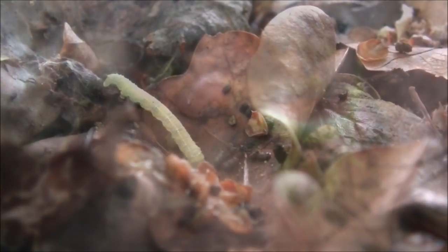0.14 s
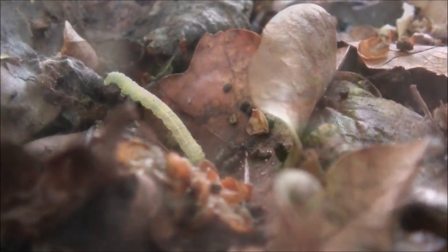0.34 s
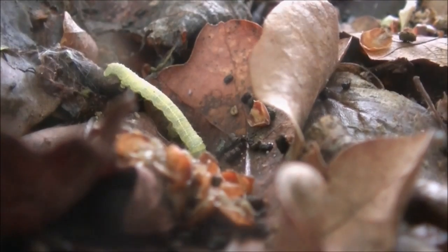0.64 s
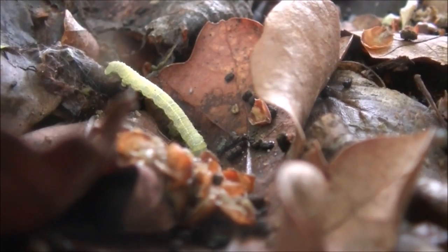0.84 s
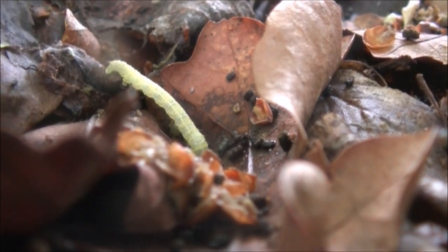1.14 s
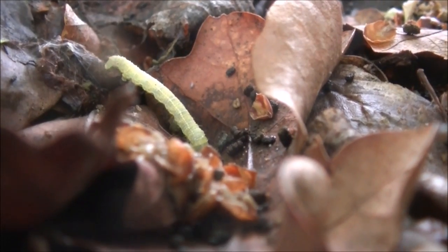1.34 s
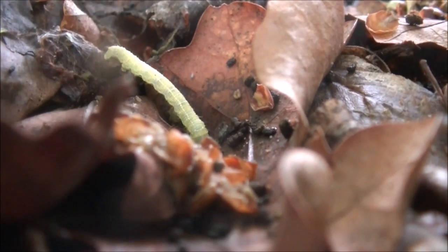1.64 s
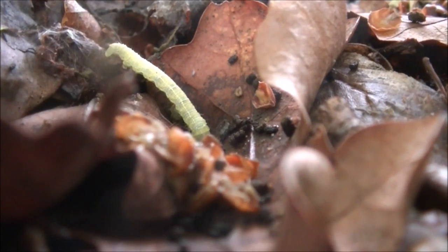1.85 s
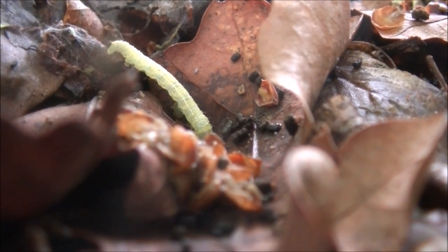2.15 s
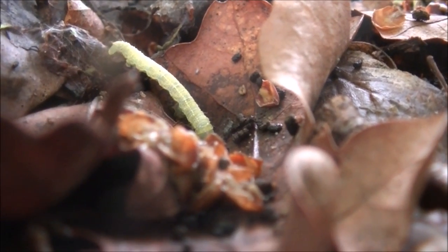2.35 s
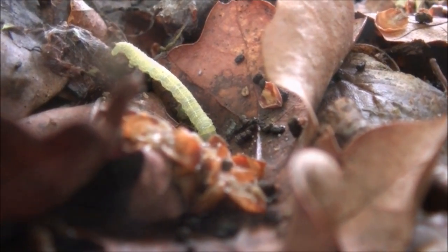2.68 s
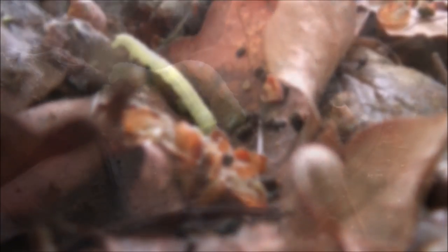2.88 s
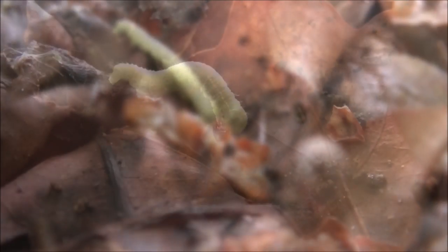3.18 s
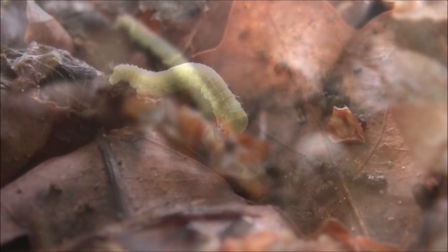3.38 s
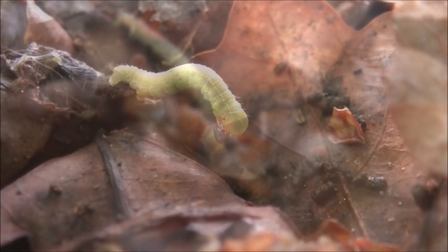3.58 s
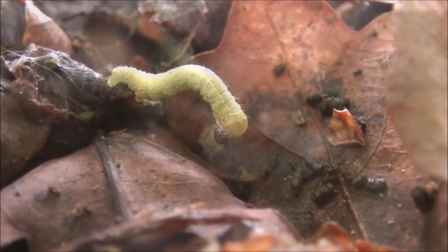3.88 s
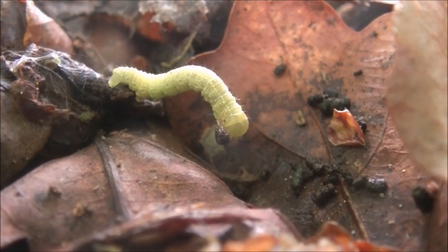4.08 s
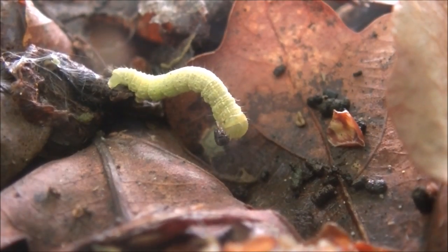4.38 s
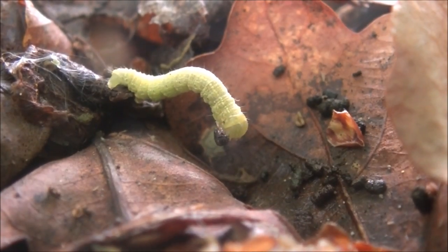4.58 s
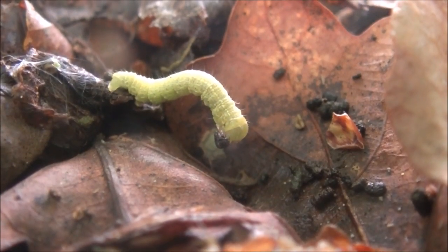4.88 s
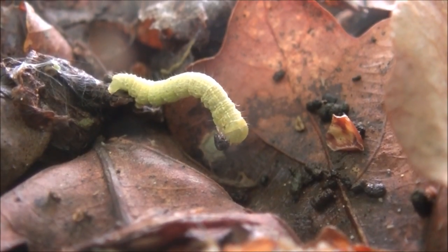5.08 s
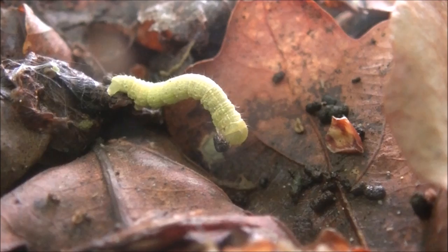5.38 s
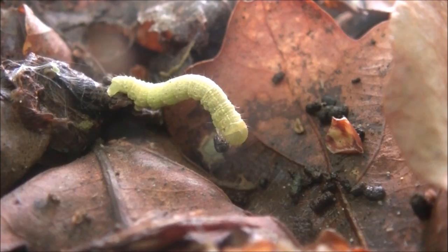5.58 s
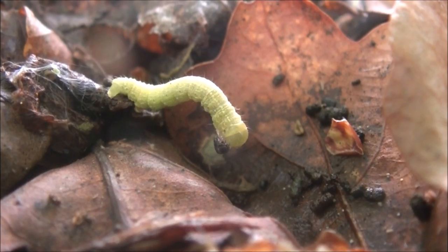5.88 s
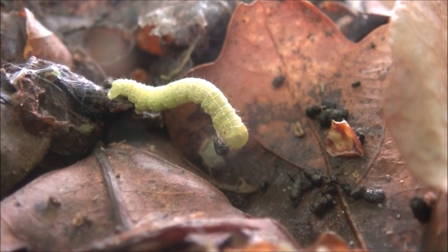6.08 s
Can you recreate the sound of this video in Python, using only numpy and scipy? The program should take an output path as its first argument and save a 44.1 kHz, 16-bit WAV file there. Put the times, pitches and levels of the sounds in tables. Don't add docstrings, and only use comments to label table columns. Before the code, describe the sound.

Pellets patter sparsely onto stiff dead leaves right beside a stereo microphone, like scattered raindrops. Light ticks come first, a hard crack near two seconds, then a cluster of strong snapping blows between about 2.8 and 4.2 seconds, followed by sparse, quieter ticks. Small leaf scrapes and dull thuds lie beneath. High bird chips and short whistles echo far off among trees, over a soft hush and barely audible high whine.

```python
import sys
import numpy as np
from scipy import signal
from scipy.fft import rfft, irfft
from scipy.io import wavfile
from scipy.ndimage import uniform_filter1d

SR = 44100
rng = np.random.default_rng(int(sys.argv[2]) if len(sys.argv) > 2 else 0)


def makeup_ratio(level_db):
    decades = np.asarray(level_db, float) / 20
    return 10 ** decades


def unload_audio(sound):
    columns = np.transpose(np.atleast_2d(sound))
    steps = np.round(np.clip(columns, -1, 1) * 32767)
    wavfile.write(sys.argv[1], SR, steps.astype(np.int16))


N = 274729


def evened(x):
    return x / np.sqrt(np.mean(x ** 2) + 1e-20)


def read(points, hz):
    f, value = np.transpose(points)
    return np.interp(np.log(hz + 1), np.log(f + 1), value)


def follow(rows):
    s, db = np.transpose(rows)
    return makeup_ratio(np.interp(np.arange(N) / SR, s, db, left=-140, right=-140))


def add(mix, s, sound):
    part = mix[..., round(s * SR):][..., :sound.shape[-1]]
    part += sound[..., :part.shape[-1]]


def sides(pan_db):
    return makeup_ratio(np.array([[pan_db / 2], [-pan_db / 2]]))


def bandpass(order, low_hz, high_hz, x):
    return signal.sosfilt(signal.butter(order, [low_hz, high_hz], "bandpass", fs=SR, output="sos"), x)


def low_cut(x):
    return signal.sosfilt(signal.butter(2, 330, "highpass", fs=SR, output="sos"), x)


def coloured(x, colour, same):
    hz = np.fft.rfftfreq(N, 1 / SR)
    mid, side = rfft(x) * makeup_ratio(read(colour, hz))
    likeness = np.clip(read(same, hz), -1, 1)
    mid = mid * np.sqrt(1 + likeness)
    side = side * np.sqrt(1 - likeness)
    return evened(irfft(np.array([mid + side, mid - side]), N))


def modes(t, hz, t60, rise):
    decay = makeup_ratio(-60 * t / np.reshape(t60, (-1, 1)))
    ring = (np.sin(2 * np.pi * np.outer(hz, t)) * decay).sum(0)
    ring = ring * (1 - np.exp(-t / rise))
    return ring / np.linalg.norm(ring)


def burst(noise, t, low_hz, high_hz, t60):
    snap = bandpass(3, low_hz, high_hz, noise * makeup_ratio(-60 * t / t60))
    return snap / np.linalg.norm(snap) * np.sqrt(len(noise))


def pellets():
    # (t/s, leaf ring level/dB, leaf ring f/Hz, low knock/dB, bright crack/dB)
    hard_left = [
        (0.3284, -32, 4640, -50, -28),
        (1.4801, -20.5, 5830, -41.5, -56),
        (2.5046, -22.5, 4020, -44, -30),
        (2.8629, -28, 4200, -36, -22),
        (3.7111, -20, 4800, -34, -50),
        (3.7238, -26, 5200, -42, -49),
        (4.0188, -32, 4450, -45, -35),
    ]
    hard_ahead = [
        (2.8011, -18, 5200, -32, -16),
        (2.8907, -16, 5210, -32, -18),
        (3.5328, -16, 5000, -32, -22.5),
        (3.5756, -17.5, 5260, -30, -41),
        (3.9594, -27, 6370, -64, -27.5),
        (4.1815, -26.5, 6600, -46, -34.5),
        (5.7612, -29, 5220, -44, -26),
        (5.8206, -32, 5190, -42, -28),
    ]
    hard_right = [
        (0.7531, -37, 5010, -50, -35.5),
        (1.8424, -26.5, 6460, -63, -28.5),
        (1.8572, -30, 2680, -47, -38),
        (1.9703, -20, 3300, -45, -18),
        (2.0299, -28, 4900, -46, -26),
        (2.5261, -31, 6500, -48.5, -28),
        (3.1049, -30, 4800, -38, -22),
        (4.8638, -28.5, 3540, -50, -43.5),
    ]
    # (t/s, strength/dB, leaf ring f/Hz, left minus right/dB)
    on_thick = [(0.6211, -26, 3600, 0.5), (1.1362, -27, 2590, 6.5), (1.2383, -27, 2620, 7.5),
                (1.2707, -27, 2670, 6), (1.4196, -28, 4000, 6), (1.4284, -34.5, 2500, 10),
                (1.6258, -41.5, 2400, 8), (2.4853, -42, 3490, -3), (2.8483, -29.5, 5700, 3),
                (2.885, -33, 5200, 8), (3.0407, -26, 4530, 4), (3.1227, -38, 2200, -1),
                (3.3482, -30, 2270, 0), (3.991, -30.5, 4700, 1), (4.0239, -32, 3360, 5),
                (4.4625, -41, 3940, -1), (4.5777, -40.5, 4650, 5), (4.765, -36.5, 5600, 3),
                (5.404, -36, 3800, 0), (5.412, -42, 3750, -7), (5.863, -45, 2020, 2),
                (6.1077, -43.5, 3620, -3)]
    on_thin = [(0.2862, -36.5, 6000, 2), (0.3215, -36, 4010, 7), (0.3352, -43, 3840, -5),
               (0.5362, -31, 3500, 1), (1.1789, -32.5, 3800, -2), (1.5376, -39, 4340, 2),
               (1.7049, -36.5, 4100, 2), (2.0606, -30.5, 4740, 4), (2.3223, -38, 5340, 1),
               (3.0965, -34, 3730, 2), (3.2888, -34.5, 4700, 0), (5.5956, -34.5, 5130, 1),
               (5.7932, -40, 3320, 5)]
    on_crisp = [(0.1292, -42.5, 2500, -6), (0.4144, -31, 3940, 0), (0.6, -43, 4400, 1),
                (1.2161, -36, 6160, -4), (1.734, -32.5, 6300, -1), (1.8776, -33, 6370, -3),
                (1.9229, -30, 4360, -2), (2.9297, -27.5, 4300, -3), (3.9005, -37.5, 6700, 1),
                (3.937, -37, 6660, 0), (3.946, -47, 6900, -2), (3.9713, -38, 4500, -12),
                (4.623, -43, 6800, 0), (4.818, -50, 4320, -1), (5.3312, -39.5, 4120, 0),
                (6.1198, -38, 6000, -2)]
    on_loose = [(0.4811, -39.5, 3340, 5), (0.6995, -36, 5300, 7), (0.8579, -39.5, 4360, -1),
                (1.1637, -39.5, 4360, 4), (1.5036, -40.5, 4360, 5), (1.6046, -32.5, 3300, -1),
                (1.6364, -38, 4770, -2), (1.69, -36.5, 1790, -3), (1.814, -38, 4540, 0),
                (2.1646, -38, 3600, 0), (2.5895, -34.5, 3870, 0), (2.6485, -38, 4400, 3),
                (2.7311, -40.5, 3350, -4), (3.1744, -31.5, 5600, -4.5), (3.6019, -36.5, 5500, -5),
                (3.706, -43, 5500, -4), (3.7692, -35, 2740, -2), (3.8357, -35, 4500, -8),
                (3.889, -34.5, 1840, -4), (4.2835, -39.5, 1720, -4), (4.887, -46, 4200, 10),
                (4.943, -45, 4030, -6), (3.1015, -29, 5040, 2), (3.108, -35, 4570, 1),
                (0.1, -45.5, 6140, 2)]
    on_far = [(.085, -45, 6500, 0), (1.975, -42, 6800, -2), (1.981, -38, 4600, -2), (2.025, -40, 6500, -2),
              (2.917, -46, 6800, 0), (3.738, -44, 6500, 0), (.541, -36, 6700, 0), (.953, -48, 5500, 0),
              (1.12, -47, 2000, 1), (1.221, -38, 2500, 0), (1.253, -43, 6600, 0), (1.396, -43, 6200, 0),
              (1.597, -44, 1700, 0), (2.185, -46, 1700, 0), (2.614, -44, 2000, 0), (2.771, -42, 4000, 1),
              (3.205, -46, 6000, 0), (3.292, -40, 2200, 0), (3.377, -44, 6500, 0), (3.752, -43, 2800, 0),
              (3.778, -43, 6000, 0), (3.855, -42, 6700, 1), (3.92, -42, 1700, 0), (4.045, -42, 2000, 0),
              (4.171, -37, 5800, 0), (4.211, -41, 3640, 0), (4.255, -45, 3640, 0), (5.383, -46, 3500, -1),
              (5.505, -49, 2700, 0), (5.665, -48, 6000, 0), (5.75, -44, 6700, 0), (5.965, -46, 3500, 0)]
    # (ring/dB, knock/dB, crack/dB)
    thick = (0, -20.5, -39)
    thin = (0, -33, -14)
    crisp = (-1, -27, 0)
    loose = (0, -12, -3)
    far = (0, -14, -6)

    landings = []
    for rows, pan_db in [(hard_left, 3), (hard_ahead, .8), (hard_right, -4)]:
        landings += [tuple(row) + (pan_db,) for row in rows]
    kinds = [(on_thick, thick), (on_thin, thin), (on_crisp, crisp), (on_loose, loose), (on_far, far)]
    for rows, (ring_db, knock_db, crack_db) in kinds:
        for s, db, hz, pan_db in rows:
            landings.append((s, db + ring_db, hz, db + knock_db, db + crack_db, pan_db))
    return landings


def ticks():
    out, t = np.zeros((2, N)), np.arange(1800) / SR
    rows = pellets()
    grit = rng.standard_normal((len(rows), 3, len(t)))
    chance = rng.random((len(rows), 3))
    for (s, ring_db, hz, knock_db, crack_db, pan_db), u, (a, b, c) in zip(rows, chance, grit):
        slap = burst(a + .25 * np.array([b, -b]), t, min(.85 * hz, 3600), 7000, .0022)
        crack = burst(c + .26 * np.array([a, -a]), t, 7980, 10560, .0041)
        spark = burst(b + .15 * np.array([c, -c]), t, 12300, 16200, .002)
        crunch = burst(b + .27 * np.array([c, -c]), t, 323, 1790, .0073)

        leaf = modes(t, [hz], .005, .00006) + makeup_ratio(-4) * slap
        leaf = leaf + makeup_ratio(-14.5) * modes(t, [2200], .0036, .00053)
        leaf = leaf + makeup_ratio(-9) * modes(t, [2200, 1400 + 3000 * u[2], 3900], .0082, .0018)

        knock = modes(t, [560 + 200 * u[0], 850 + 500 * u[1]], [.012, .01], .000095) + makeup_ratio(6) * crunch
        knock = knock + .36 * np.roll(knock, 9) * [[-1], [1]]

        tick = makeup_ratio(ring_db) * leaf + makeup_ratio(crack_db) * (crack + makeup_ratio(-15.5) * spark) + makeup_ratio(knock_db) * knock
        add(out, s - .0001, makeup_ratio(11.5) * tick * sides(pan_db))
    return low_cut(out)


def stiff_leaves():
    # (f/Hz, spectral height/dB, t60/s)
    struck = [((0.3282, .0003, 2), [(2000, 0, .006), (3850, -1, .004), (5500, 0, .004)]),
              ((0.7531, .0003, -3), [(900, -2, .012), (2300, 0, .008)]), ((1.4196, .0002, 5),
              [(2540, 8, .006), (5800, 3, .003)]), ((1.9703, .0002, -2), [(2230, 15, .004),
              (3200, 13, .003), (5510, 9, .004), (9190, 12, .003)]), ((2.0295, .0009, -2), [(624, 0, .02),
              (2130, 7, .012), (2730, 6, .01), (4150, 3, .006)]), ((2.8011, .0001, 1), [(840, 14, .005),
              (2170, 15, .009), (2850, 0, .01), (4005, 20, .006), (5200, 14, .003), (7480, 11, .003),
              (10800, 8, .003)]), ((2.8627, .0003, 1), [(645, 2, .015), (1440, 7, .01), (2930, 9, .008),
              (6570, 4, .004), (9310, 7, .004)]), ((2.8907, .0002, 0), [(820, 13, .005), (2230, 18, .009),
              (2900, 2, .01), (4040, 22, .006), (5100, 15, .003), (8990, 8, .003)]), ((3.1045, .0008, -4),
              [(495, 4, .025), (1510, 4, .015), (6080, 2, .008)]), ((3.5328, .0002, 1.5), [(764, 13, .004),
              (2185, 17, .009), (3280, 6, .01), (4166, 23, .006), (4900, 17, .004), (6220, 12, .005)]),
              ((3.7238, .0003, 2), [(785, 0, .005), (2620, 1, .008), (3200, -6, .01), (4015, 11, .005),
              (5300, 6, .004)]), ((5.7605, .001, 1), [(1020, -5, .012), (2580, 4, .012), (3305, 10, .01)]),
              ((5.8206, .0003, 0), [(936, 3, .012), (2090, 1, .01), (3080, 1, .012), (3770, 4, .008),
              (6535, -3, .006)])]
    damping = 1.35
    skew = .2
    out, t = np.zeros((2, N)), np.arange(1800) / SR
    for (s, rise, pan_db), table in struck:
        hz, db, t60 = np.transpose(table)[..., None]
        decay = damping * np.log(1000) / t60
        height = makeup_ratio(db + .2) * 2 * decay * (1 + decay * rise) / SR
        height = height * (-1) ** np.arange(len(hz))[:, None]
        ring = (height * np.exp(-decay * t) * np.sin(2 * np.pi * hz * t)).sum(0)
        ring = ring * (1 - np.exp(-t / rise))
        add(out, s - .0001, (ring + skew * np.roll(ring, 7) * [[1], [-1]]) * sides(pan_db))
    return low_cut(out)


def jolts():
    # (t/s, low push level/dB, high spark level/dB)
    blows = [
        (1.9703, -52, -26),
        (2.8011, -14, 1.5),
        (2.8911, -39, -7.5),
        (3.5334, -10, -15),
        (3.7236, -56, -25),
        (4.224, -22, -62),
    ]
    out, t = np.zeros((2, N)), np.arange(400) / SR
    for s, push_db, spark_db in blows:
        push = t / .00034 * np.exp(-t / .00018) * np.array([[1], [.2]])
        spark = modes(t, [13500, 14800, 16000], .0013, .00005)
        add(out, s, makeup_ratio(push_db) * push + makeup_ratio(spark_db) * spark)
    return out


def bumps():
    # (t/s, peak level/dB, f/Hz)
    thuds = [
        (0.832, -47, 201),
        (2.5, -36.5, 253),
        (2.585, -36.5, 242),
        (2.643, -35.5, 325),
        (3.87, -40, 182),
        (4.41, -38.5, 298),
        (4.572, -34, 313),
        (5.336, -35, 338),
        (5.408, -37.5, 475),
        (5.424, -37.5, 304),
    ]
    out, t = np.zeros((2, N)), np.arange(3000) / SR
    for (s, db, hz), u in zip(thuds, rng.random((len(thuds), 4))):
        pair = []
        for a, b in u.reshape(2, 2):
            pitches = hz * np.array([.45 + .38 * a, 1, 1.414 + .37 * b])
            pair.append(modes(t, pitches, .031, .0098))
        add(out, s, makeup_ratio(db + 12.5) * np.array(pair) * sides(-1.5))
    return out


def crackle(per_s, spread_db):
    out = np.zeros((2, N))
    smear = np.exp(-np.arange(150) / 22)
    for low_hz, high_hz in [(60, 2500), (1500, 6500), (4000, 10000), (7000, 17000)]:
        size = makeup_ratio(spread_db * np.minimum(rng.exponential(1, N), 5))
        snaps = size * (rng.random(N) < per_s / SR)
        grit = signal.oaconvolve(snaps, smear)[:N] * rng.standard_normal((2, N))
        out += bandpass(2, low_hz, high_hz, grit)
    return out


def rustle():
    # (t/s, level/dB)
    settling = [(0.0, -66), (0.69, -60), (0.85, -66), (0.87, -78), (1.18, -69.5), (1.86, -64.5),
                (2.41, -71), (2.62, -66), (2.68, -76), (2.78, -66), (2.97, -59.5), (3.16, -62), (3.88, -59),
                (4.27, -67), (5.1, -76.5), (5.64, -70), (6.23, -82)]
    # (t/s, level/dB)
    shuffling = [
        (3.76, -75),
        (3.9, -50.5),
        (4.05, -52),
        (4.12, -62),
        (4.2, -44.5),
        (4.24, -52.5),
        (4.32, -61),
    ]
    # (t/s, level/dB)
    dragging = [
        (.76, -49),
        (.8, -51),
        (.84, -41.5),
        (.856, -41),
        (.86, -75),
    ]
    # (f/Hz, level/dB per Hz)
    litter_colour = [(150, -2), (600, -2), (1500, -8), (4000, -0.5), (7500, -9), (10000, -15),
                     (12500, -16.5), (16000, -29)]
    shuffle_colour = [(150, -13), (500, -3.5), (1500, -11), (4000, -13.5), (7000, -18), (11000, -35)]
    scrape_colour = [(59, -27), (100, -17), (193, 1.5), (1030, -22.5), (1170, -21), (3320, -6.5),
                     (8640, -16.5), (9820, -10.5), (14400, -27), (16000, -36)]
    same = [(200, 0), (1000, 0), (8000, .97)]  # (f/Hz, left-right likeness)

    litter = coloured(crackle(450, .75), litter_colour, same) * follow(settling) * makeup_ratio(8.5)
    shuffle = coloured(crackle(500, 1.8), shuffle_colour, same) * follow(shuffling)
    scrape = coloured(crackle(1500, .63), scrape_colour, same) * follow(dragging)
    return litter + shuffle + scrape


def chip_calls(waver):
    # (t/s, level/dB, top pitch f/Hz, fade away from the top/dB)
    calls = [(0.179, -43.5, 4820, -8), (.52, -56.5, 5010, -8), (.61, -56, 4550, -8),
             (1.248, -43.5, 4900, -5), (2.238, -42.5, 4880, -8), (2.9, -52.5, 4900, -8),
             (2.942, -45.5, 4880, -5), (3.3, -50, 4900, -4), (3.819, -46, 4940, -7),
             (3.903, -46.5, 4950, -7), (4.484, -46, 4880, -9), (5.558, -43, 5070, -11)]
    length_s, skew, foot, sag, waver_hz = .042, .581, .71, .0495, 35
    perches = np.zeros((3, N))
    t = np.arange(0, length_s, 1 / SR)
    arch = np.sin(np.pi * (t / length_s) ** skew)
    for k, (s, db, hz, fade_db) in enumerate(calls):
        shake = waver_hz * waver[round(s * SR):][:len(t)]
        pitch = hz * (foot + (1 - foot) * arch - sag * t / length_s) + shake
        turn = 2 * np.pi * np.cumsum(pitch) / SR
        voice = np.sin(turn) + makeup_ratio(-24) * np.sin(turn / 2) + makeup_ratio(-19) * np.sin(1.5 * turn)
        loudness = makeup_ratio(db + fade_db * (1 - arch)) * signal.windows.tukey(len(t), .06)
        add(perches[k % 3], s, loudness * voice)
    return perches


def whistled_notes(waver, flutter):
    # (t/s, length/s, f/Hz, level/dB)
    clear = [(0.01, 0.1, 3400, -57.5), (.13, 0.06, 3400, -52.5), (.398, 0.124, 3400, -52),
             (.672, 0.081, 3390, -50), (.902, 0.037, 5050, -48.5), (1.196, 0.052, 3174, -51.5),
             (1.33, 0.24, 3170, -59.5), (1.045, .03, 3350, -58), (2.66, 0.1, 3420, -61),
             (3.29, 0.087, 3375, -50.5), (3.884, 0.097, 3600, -45), (4.059, 0.093, 3645, -48.5),
             (4.098, 0.074, 3210, -50), (4.244, 0.073, 2644, -60), (4.885, 0.047, 3110, -57.5),
             (5.056, 0.063, 3310, -58), (5.14, 0.075, 2930, -62), (5.236, 0.09, 2900, -61),
             (5.685, 0.18, 3460, -60), (5.83, 0.17, 3510, -60)]
    # (t/s, length/s, f/Hz, level/dB)
    husky = [(0, 0.063, 3830, -50), (.1, 0.067, 7580, -57.5), (.24, 0.065, 7970, -57),
             (1.09, .08, 3700, -59), (.88, .05, 4150, -60), (.97, .04, 3600, -61), (3.167, .13, 4660, -48),
             (3.755, 0.12, 4600, -47), (4.219, 0.45, 6780, -62), (4.299, 0.28, 3980, -59),
             (4.497, .2, 6570, -57.5), (4.935, 0.12, 3850, -57.5), (5.99, 0.093, 3250, -56.5)]
    out = np.zeros(N)
    for notes, glide_hz_per_s, waver_hz in [(clear, -300, 32.4), (husky, 654, 110)]:
        for s, length, middle_hz, db in notes:
            n = round(length * SR)
            glide = glide_hz_per_s * length * np.linspace(-.5, .5, n)
            hz = middle_hz + glide + waver_hz * waver[round(s * SR):][:n]
            tone = np.sin(2 * np.pi * np.cumsum(hz) / SR)
            add(out, s, makeup_ratio(db + 1) * tone * signal.windows.tukey(n, .25))
    return out * makeup_ratio(2 * flutter[:N] - .4)


def wood(x, start, shorten):
    # (f/Hz, t60/s)
    ring_time = [(2500, 1.4), (3500, 0.76), (5000, 0.98), (8000, 0.25)]
    taps = np.zeros((2, SR))
    slots = np.arange(start, SR - 20, 20)
    at = slots + rng.integers(0, 20, (2, len(slots)))
    np.put_along_axis(taps, at, rng.choice([-1., 1.], at.shape), 1)

    hz, t, z = signal.stft(taps, SR, nperseg=256)
    decay = makeup_ratio(-60 * t / (shorten * read(ring_time, hz)[:, None]))
    shared, apart = signal.istft(z * decay, SR, nperseg=256)[1]
    tail = shared + .22 * np.array([apart, -apart])
    tail = tail / np.linalg.norm(tail[0])

    cut = round(.86 * SR)
    wet = [signal.fftconvolve(part[None], tail, axes=1)[:, :len(part)] for part in (x[:cut], x[cut:])]
    return np.hstack(wet)


def birds():
    waver = evened(uniform_filter1d(rng.standard_normal(N + SR), 250))
    flutter = evened(uniform_filter1d(rng.standard_normal(N + SR), 500))
    chips = chip_calls(waver)
    whistles = whistled_notes(waver, flutter)
    far = makeup_ratio(-7) * chips.sum(0) * sides(1.5)
    far += makeup_ratio(6.5) * sum(wood(perch, start=20, shorten=.88) for perch in chips)
    far += makeup_ratio(-3.5) * whistles + makeup_ratio(-6) * wood(whistles, start=40, shorten=.78)
    return far


def air():
    # (f/Hz, level/dB per Hz)
    hush_colour = [(15, -39), (40, -39), (100, -3.5), (200, 5.5), (330, 5), (690, 0.5), (2200, -7.5),
                   (3300, -4), (7300, -13.5), (11000, -15.5), (14800, -20), (15800, -22), (16150, -40)]
    # (f/Hz, left-right likeness)
    hush_same = [(60, -0.43), (250, -0.61), (700, -0.76), (2000, -0.14), (6000, 0.9), (14000, 1)]
    swell_db = .6 * evened(uniform_filter1d(rng.standard_normal(N), 6000))
    return makeup_ratio(-56 + swell_db) * coloured(rng.standard_normal((2, N)), hush_colour, hush_same)


def whine():
    return np.sqrt(2) * makeup_ratio(-69) * np.sin(2 * np.pi * 7800 * np.arange(N) / SR)


def scene():
    near = ticks() + stiff_leaves()
    scatter = makeup_ratio(-34.5) * wood(near.mean(0), start=200, shorten=.1)
    return near + scatter + jolts() + bumps() + rustle() + birds() + air() + whine()


def top_cut(x):
    return signal.sosfilt(signal.butter(12, 17140, fs=SR, output="sos"), x)


def record(dry):
    lowpass = signal.firwin(601, 16850, window=("kaiser", 9), fs=SR)
    limited = signal.oaconvolve(np.clip(dry, -1, 1), lowpass[None], "same")
    return top_cut(limited)


dry = scene()
out = record(dry)
unload_audio(out)
```